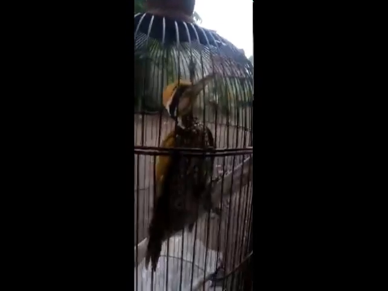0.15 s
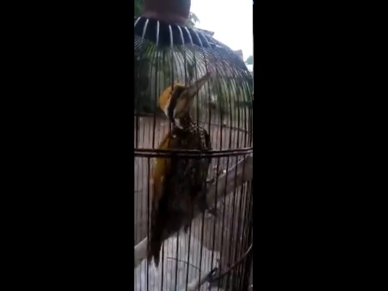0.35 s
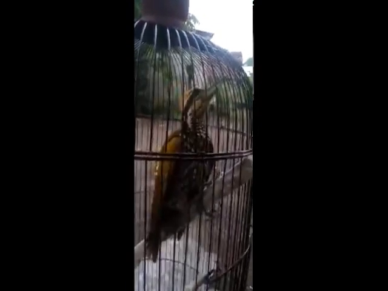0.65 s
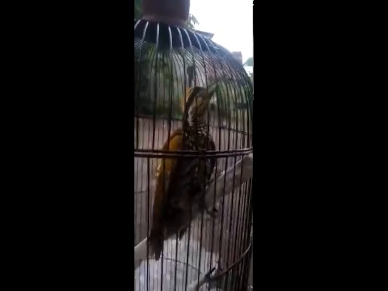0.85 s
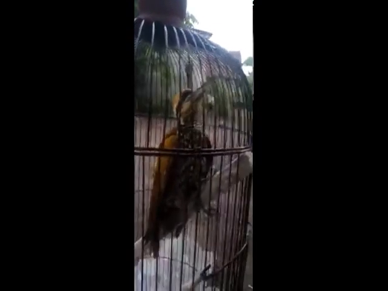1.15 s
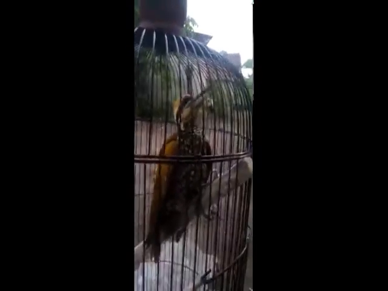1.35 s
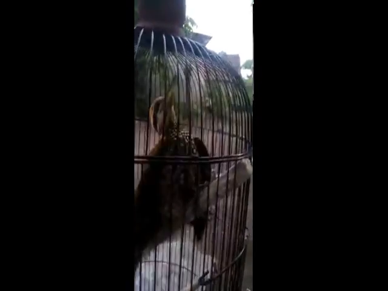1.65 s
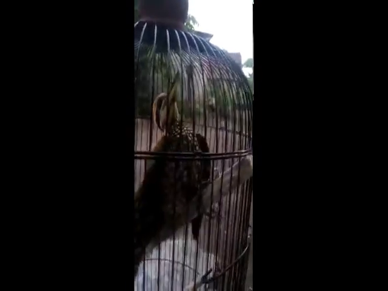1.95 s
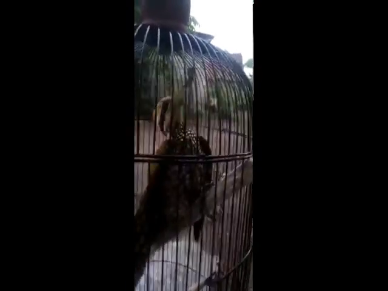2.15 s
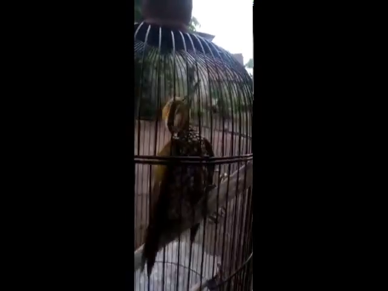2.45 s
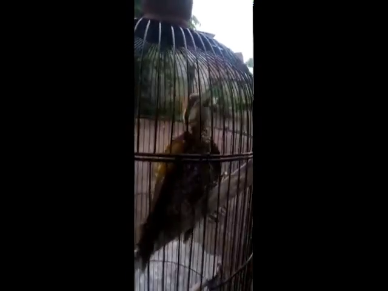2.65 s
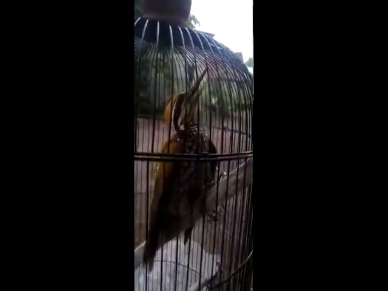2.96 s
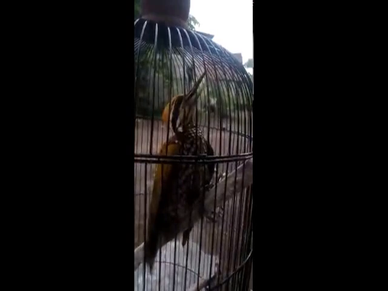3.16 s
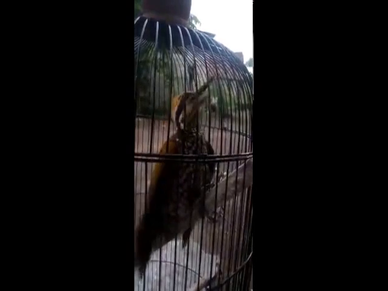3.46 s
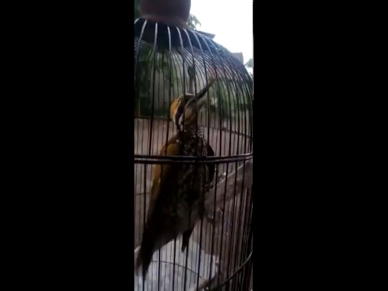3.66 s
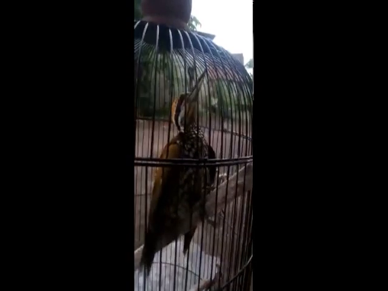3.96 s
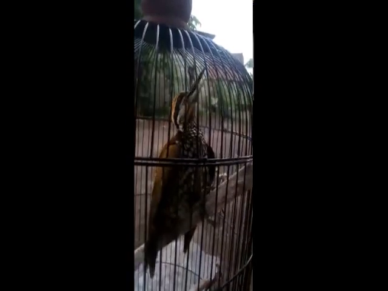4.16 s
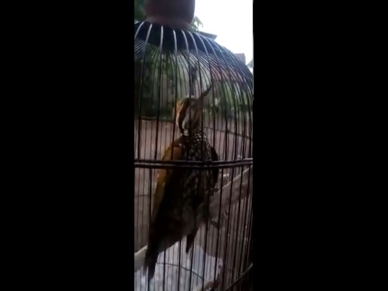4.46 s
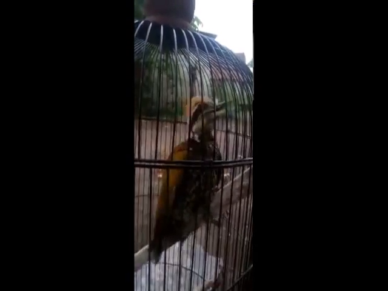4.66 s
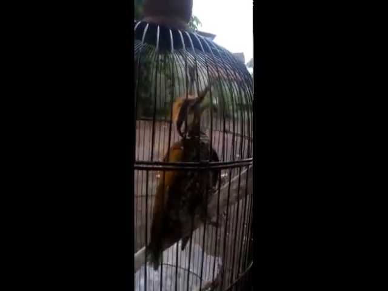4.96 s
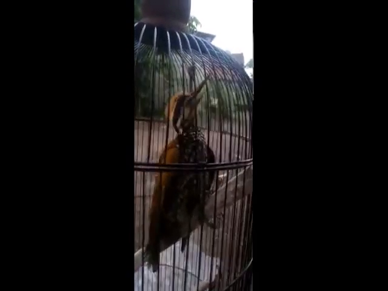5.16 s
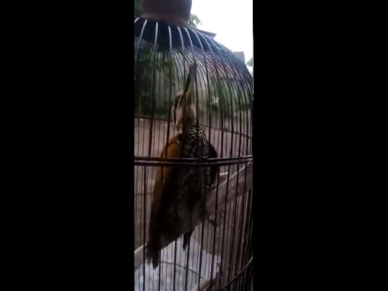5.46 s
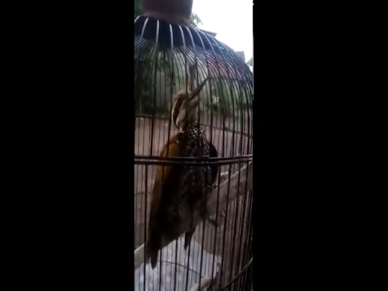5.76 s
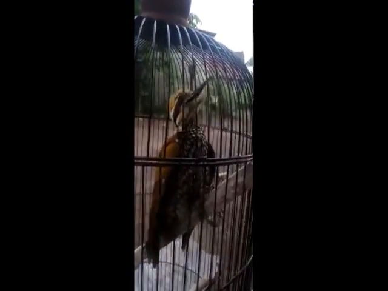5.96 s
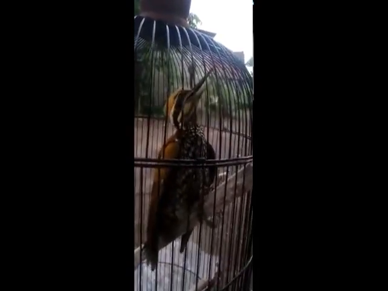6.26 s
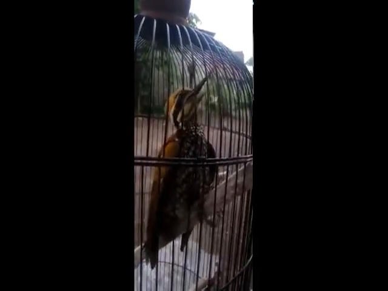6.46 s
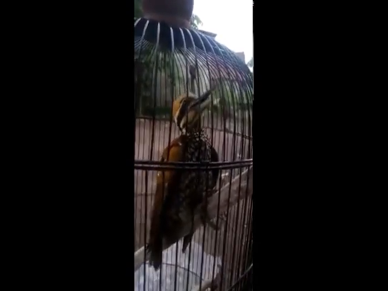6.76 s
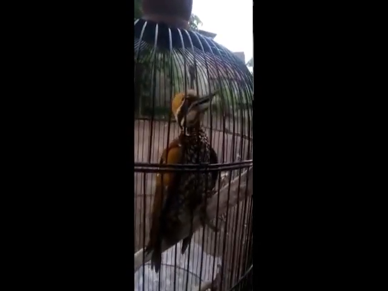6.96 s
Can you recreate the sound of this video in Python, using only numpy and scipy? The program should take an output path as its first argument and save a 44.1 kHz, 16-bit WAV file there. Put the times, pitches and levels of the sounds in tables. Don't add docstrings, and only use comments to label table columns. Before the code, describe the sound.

Quiet walled yard with leaf rustle, faint bird calls and distant cock over traffic, then a loud, fast woodpecker rattle close by to the end.

```python
import sys
import numpy as np
from scipy import signal
from scipy.fft import rfft, irfft, next_fast_len
from scipy.io import wavfile
from scipy.ndimage import uniform_filter1d

SR = 44100
rng = np.random.default_rng(int(sys.argv[2]) if len(sys.argv) > 2 else 0)


def volts(x):
    e = np.asarray(x, float) / 20
    return 10 ** e


def bounce(signal):
    frames = np.transpose(np.atleast_2d(signal))
    limited = np.clip(frames, -1, 1)
    pcm = np.round(limited * 32767).astype(np.int16)
    wavfile.write(sys.argv[1], SR, pcm)


N = 313992
TIME_S = np.arange(N) / SR
PORT_LAG = 9.18

# start_s, level_db, length_ms, throat opening as first_over_second_partial_db
RATTLE_NOTES = [(2.79, -19, 21.2, -1.5), (2.861, -17, 22.4, 1), (2.931, -16, 21.2, 0.5), (3.0, -17.5, 23, -1),
                (3.07, -18, 22.7, 1), (3.141, -17, 25.2, 0.5), (3.212, -17, 24.4, -0.5),
                (3.285, -17, 22.3, -4.5), (3.361, -16, 23.1, -0.5), (3.434, -17, 25.6, 0),
                (3.509, -17.5, 25, 1.5), (3.585, -17.5, 23.4, -2), (3.663, -17.5, 22, -2),
                (3.741, -18, 24.5, -2.5), (3.821, -17, 21, -4), (3.901, -17.5, 25.4, 0), (3.984, -14.5, 20.6, 1),
                (4.07, -15.5, 20.3, 2.5), (4.151, -16.5, 21.5, -1), (4.233, -17.5, 22.6, -2.5),
                (4.312, -15, 21, 1), (4.392, -16, 26, 2), (4.474, -16, 27.7, 1.5), (4.56, -17.5, 30.7, -2),
                (4.664, -18.5, 29, -9),
                (4.774, -17.5, 30.65, -2.5), (4.862, -18, 28.34, -3), (4.947, -18, 25.1, -1),
           (5.03, -17, 26.46, -2), (5.115, -16, 22.97, -4), (5.199, -18.5, 24.9, -5.5),
           (5.288, -15, 21.18, -1.5), (5.373, -14.5, 23.32, 1), (5.457, -15, 23.69, 2),
           (5.547, -15.5, 22.03, -0.5), (5.634, -14.5, 21.6, 3.5), (5.717, -15.5, 23.73, 1.5),
           (5.811, -17.5, 25.83, -2), (5.917, -16.5, 23.58, -3), (6.01, -18, 29.08, -6),
           (6.1, -16, 25.5, 1), (6.186, -16, 27.44, 2), (6.273, -15, 23.92, 0), (6.364, -16.5, 24.9, -2.5),
           (6.454, -17, 24.26, -4.5), (6.543, -16.5, 30.05, -2), (6.633, -17, 28.93, -2.5),
           (6.736, -18, 27.88, -3), (6.835, -18.5, 30, -3.5), (6.941, -16.5, 29.52, -7.5),
           (7.052, -17, 27.2, -2)]
# multiple, left_level_db, right_re_left_db, change_at_full_sag_db
THROAT = [
    (1, -1, -11, -10),
    (2, -4, -13, 1),
    (3, -1, -12.5, -5.5),
    (4, -8, -2.5, -11.5),
]
PITCH_ARCH = [(-.2, 1.3), (.05, .9), (.2, .12), (.5, 0.0065), (.72, .22), (.92, 0.95), (1.35, 1.5)]
# share_of_length, level_db
NOTE_SWELL = [(-.25, -52), (-.08, -21.5), (0, 0.5), (.15, 2.5), (.75, 2.5), (1.0, 1.5), (1.35, -44)]
TOP_HZ, TOP_SPREAD_HZ = 1790.4, 14
TIRES_S, TIRING_HZ_PER_S = 6.2, 110
FAST_GAP_S, FAST_SAG_HZ, SAG_HZ_PER_S_GAP = 0.061, 107.4, 3900


def rattle(notes):
    out, envelope, which = np.zeros((2, N + SR)), np.zeros(N + SR), np.zeros(N + SR, int)
    colour = rng.standard_normal((len(notes), 4))
    flutter = np.pad(volts(3.3 * wobble(420, size=8)), ((0, 0), (0, SR)))
    jitter = np.pad(0.02 * wobble(300, size=1)[0], (0, SR))
    gaps_s = np.diff(np.array(notes)[:, 0], append=notes[-1][0] + 0.096)
    for n, (start_s, level_db, length_ms, first_db) in enumerate(notes):
        top_hz = TOP_HZ + TOP_SPREAD_HZ * colour[n, 0] - TIRING_HZ_PER_S * max(start_s - TIRES_S, 0)
        sag_hz = FAST_SAG_HZ + SAG_HZ_PER_S_GAP * (gaps_s[n] - FAST_GAP_S)
        length = length_ms * SR / 1000
        share = np.arange(-.25 * length, 1.35 * length) / length
        first = round(start_s * SR - length / 4)
        at = slice(first, first + len(share))

        sag = np.interp(share, *np.transpose(PITCH_ARCH))
        hz = (top_hz - sag_hz * sag) * (1 + jitter[at] * (1 + sag))
        phase = 2 * np.pi * np.cumsum(hz) / SR
        right_phase = phase + 2 * np.pi * hz * PORT_LAG / SR
        swell = volts(level_db + np.interp(share, *np.transpose(NOTE_SWELL)))
        opening_db = [first_db, 0, 2.6 * colour[n, 2], 2.9 * colour[n, 3]]
        gains = volts(opening_db + np.array(THROAT)[:, 1])
        gains = gains / np.linalg.norm(gains)
        for i, (multiple, _, right_db, sag_db) in enumerate(THROAT):
            gain = swell * volts(sag_db * sag) * gains[i]
            out[0, at] += gain * flutter[i, at] * np.sin(round(multiple) * phase)
            right = np.sin(round(multiple) * right_phase)
            out[1, at] += gain * flutter[i + 4, at] * volts(right_db) * right
        envelope[at] += swell
        which[round(start_s * SR):] = n
    return out[:, :N], envelope[:N], which[:N]


# frequency_hz, density_db_per_hz
HAZE = [(20, -22.5), (60, 5), (300, -5.5), (900, -15), (1500, -2.5), (2500, -9.5), (3300, -4.5),
        (5000, -13), (6200, -17.5), (7300, -27.5), (7700, -43)]


def note_haze(envelope):
    early = np.roll(uniform_filter1d(envelope, size=900), -round(0.0066 * SR))
    return volts(-13.0) * early * noise(HAZE, .2, 4.83, 90) * volts([[0], [-11]])


# pitch_hz, level_db
FIZZ_TONES = [(8436, -68), (9189, -58), (9938, -62.5), (10686, -65.5), (11440, -74), (12188, -57),
              (12936, -56.5), (14061, -67)]
# frequency_hz, density_db_per_hz
FIZZ_NOISE = [(8100, -22), (8600, 1), (9800, -11), (10800, 1), (11800, 1.5), (12700, 1), (13600, -7.5),
              (14200, -7.5), (15000, -36)]


def top_fizz(envelope, which):
    sharp = 8.7 * envelope ** 2
    follow = sharp + volts(-6) * signal.lfilter([.0006], [1, -.9994], sharp)
    out = volts(-31) * noise(FIZZ_NOISE, 0.14, 6.8, 30, per_octave=12)
    for hz, level_db in FIZZ_TONES:
        on = rng.random((which.max() + 1, 2)) < .6
        out += volts(level_db + 26.5) * on[which].T * np.sin(2 * np.pi * hz * TIME_S)
    return follow * out * volts([[0], [-2]])


# start_s, length_s, first_pitch_hz, last_pitch_hz, level_db
BUZZ = (-.02, .28, 3060, 2850, -37)


def buzzy_call():
    return voice(call(BUZZ, .01, .1, fade_db=20, bend=2.5), [0, -30], .035, 3.1, 130)


# start_s, length_s, first_pitch_hz, last_pitch_hz, level_db
SQUAWK = (.02, .26, 540, 490, -48)
SQUAWK_PARTIALS_DB = [-11, 0.5, -15.5, -7.5, -13, -4.5, -13.5, -13.5, -30, -31, -24, -12]


def squawk():
    curve = call(SQUAWK, .07, .08, fade_db=5, bend=1.5, edge_db=12)
    return voice(curve, SQUAWK_PARTIALS_DB, 0.02, 4.0, 70)


# start_s, length_s, first_pitch_hz, last_pitch_hz, level_db
WHISTLES = [
    (1.9, .09, 1500, 3650, -33),
    (6.545, .085, 1490, 3950, -26),
]


def whistles():
    curves = [call(w, 0.021, 0.037, fade_db=-2.0, bend=.8, glide=.7) for w in WHISTLES]
    return sum(voice(curve, [0, -33], 0.075, 4.7, 300) for curve in curves)


# start_s, length_s, first_pitch_hz, last_pitch_hz, level_db
CROW = [
    (.99, 0.13, 514, 538, -49.5),
    (1.03, .11, 629, 634, -50.5),
    (1.15, 0.11, 617, 621, -50),
    (1.31, .55, 616.5, 592, -60),
    (1.33, .42, 734.6, 706, -54),
    (2.02, 0.39, 670, 609, -58.5),
    (6.24, 0.28, 779, 759, -55),
    (6.7, .5, 757, 757, -60),
]
CROW_OCTAVE_DB = [-45, -26, -22, -18, -9.5, -9.5, -22, -22]


def far_cock():
    out = np.zeros(N)
    for syllable, octave_db in zip(CROW, CROW_OCTAVE_DB):
        curve = call(syllable, 0.037, 0.05, fade_db=1.0, bend=1.2)
        out += voice(curve, [0, octave_db], 0.03, 4.5, 45)
    return out


# start_s, length_s,
# first_pitch_hz, last_pitch_hz, level_db
HIDDEN = [
    (.43, .2, 5700, 5000, -64),
    (1.465, .17, 6900, 2900, -55),
    (2.38, .38, 4250, 4450, -65),
    (2.6, .17, 2900, 4900, -64),
    (2.64, .14, 2035, 3040, -57),
]


def hidden_whistles():
    curves = [call(w, .03, .04, fade_db=3.5, bend=.7, edge_db=6) for w in HIDDEN]
    return sum(voice(curve, [0], 0.02, 2.5, 160) for curve in curves)


def neighbours():
    near = ports(buzzy_call() + squawk() + whistles(), -13.5) * volts(4.0)
    far = ports(far_cock(), -5) * volts(3.0)
    return near + far, volts(-7.5) * near + volts(-1.5) * far + ports(hidden_whistles(), -8.5)


def call(row, attack_s, release_s, fade_db, bend, edge_db=18, glide=1):
    start_s, length_s, first_hz, last_hz, level_db = row
    t = np.linspace(0, length_s, num=24)
    edges = np.clip(1 - t / attack_s, 0, 1) + np.clip(1 - (length_s - t) / release_s, 0, 1)
    glided = np.minimum(t / length_s / glide, 1) ** bend
    hz = first_hz * (last_hz / first_hz) ** glided
    return list(zip(start_s + t, hz, level_db - fade_db * t / length_s - edge_db * edges))


def voice(rows, partials_db, jitter, flutter_db, flutter_hz):
    before = (rows[0][0] - .005, rows[0][1], -130)
    after = (rows[-1][0] + 0.0042, rows[-1][1], -130)
    s, hz, level_db = np.transpose([before, *rows, after])
    at = np.arange(max(round(s[0] * SR), 0), min(round(s[-1] * SR), N))
    hz, level_db = np.interp(at / SR, s, hz), np.interp(at / SR, s, level_db)
    unsteady_hz = hz * (1 + jitter * wobble(300, size=1, count=len(at))[0])
    phase = 2 * np.pi * np.cumsum(unsteady_hz) / SR
    flutter = flutter_db * wobble(flutter_hz, size=len(partials_db), count=len(at))
    shake = volts(level_db + 4.0 + flutter)
    out = np.zeros(N)
    out[at] = sum(volts(d) * shake[k] * np.sin((k + 1) * phase) for k, d in enumerate(partials_db))
    return out


def ports(x, right_db):
    return np.array([x, volts(right_db) * np.interp(np.arange(N) + PORT_LAG, np.arange(N), x)])


def yard(x):
    t60_s, build_up_s = 0.53, 0.0086
    t = np.arange(SR) / SR
    tail = rng.standard_normal((2, SR)) * volts(-60 * t / t60_s) * np.clip(t / build_up_s, 0, 1)
    return signal.fftconvolve(x, tail / np.sqrt(np.sum(tail ** 2) / 2), axes=1)[:, :N]


# start_s, hold_s, leaf_hiss_db, high_rustle_db
STIRS = [
    (0, 0.28, -61, -72),
    (0.484, 0.25, -81.5, -88),
    (1.093, 0.65, -76, -103),
    (1.66, 0, -74, -75.5),
    (1.95, 0.04, -66.5, -89.5),
    (2.7, 7, -70.5, -78),
]


def stirring():
    rise_db_per_s, fall_db_per_s = 233, 212
    still_leaf_db, still_rustle_db = -86, -101
    start_s, hold_s, *levels = np.transpose(STIRS)[:, :, None]
    t = np.arange(0, N + 64, 64) / SR
    rising_db = rise_db_per_s * np.maximum(start_s - t, 0)
    falling_db = fall_db_per_s * np.maximum(t - start_s - hold_s, 0)
    curves = []
    for level_db, still_db in zip(levels, [still_leaf_db, still_rustle_db]):
        loudest_db = (level_db - (rising_db + falling_db)).max(axis=0)
        curves.append(np.interp(TIME_S, t, np.maximum(loudest_db, still_db)))
    return curves


# frequency_hz, density_db_per_hz
LEAVES = [(880, -29.5), (1500, -18), (2140, -21.5), (2540, -16), (3500, -9.5), (4840, -11), (5770, -23),
          (6550, -42), (7500, -26), (9750, -67), (16500, -120)]
# frequency_hz, density_db_per_hz
RUSTLE = [(4470, -39), (7600, -10.5), (8250, -2.5), (8990, -8.5), (10800, 3.5), (11900, -8.5),
          (14100, -8.5), (14400, -32), (15000, -40)]


def foliage():
    leaf_db, rustle_db = stirring()
    leaves = volts(leaf_db + 12.5) * noise(LEAVES, .05, 8.0, 6, per_octave=12) * volts([[0], [-9]])
    rustle = volts(rustle_db + 15.5) * noise(RUSTLE, 0.048, 3.6, 6.48) * volts([[0], [-3]])
    return leaves + rustle


# time_s, level_db
TRAFFIC = [(0, -44.5), (.3, -47.5), (.9, -51), (1.7, -51), (2.6, -51), (4.4, -49.5), (4.7, -51),
           (5.6, -49.5), (5.9, -50.5), (6.5, -48), (7.12, -51)]
# frequency_hz, density_db_per_hz
RUMBLE = [(12, -65), (20, -14), (54, -6.5), (139, -0.5), (188, -8), (227, -1.5), (300, -15.5), (500, -20),
          (560, -25), (639, -19.5), (786, -34), (1000, -24.5), (1800, -57.5), (2340, -106), (3960, -120)]


def traffic():
    level_db = np.interp(TIME_S, *np.transpose(TRAFFIC))
    return volts(level_db + 4.5) * noise(RUMBLE, 1.0, 2.66, 14) * volts([[0], [-7]])


# pitch_hz, level_db
HUM = [
    (9000, -100),
    (10500, -104),
    (12000, -89),
    (13500, -102),
]


def electric_hum():
    return sum(volts(level_db) * np.sin(2 * np.pi * hz * TIME_S) for hz, level_db in HUM)


def noise(points, alike, patchy_db, patch_rate, per_octave=3):
    long = next_fast_len(N, True)
    mid, side = rfft(rng.standard_normal((2, long)))
    hz, level_db = np.transpose(points)
    grid = np.arange(1, len(mid) + 1)
    colour = volts(np.interp(np.log(grid * SR / long), np.log(hz), level_db, -90, -90))
    pair = colour * (np.sqrt(1 + alike) * mid + np.sqrt(1 - alike) * side * [[1], [-1]])
    band = (per_octave * np.log2(grid)).astype(int) % 8
    flicker = volts(patchy_db * wobble(patch_rate, size=8))
    return rms_one(sum(flicker[k] * irfft(pair * (band == k), long)[:, :N] for k in range(8)))


def wobble(rate_hz, size, count=N):
    knots = rng.standard_normal((size, 4000))
    return np.array([np.interp(np.arange(count) * rate_hz / SR, np.arange(4000), k) for k in knots])


def rms_one(x):
    return x / np.sqrt(np.mean(x ** 2) + 1e-20)


def scene():
    notes, envelope, which = rattle(RATTLE_NOTES)
    direct, echoed = neighbours()
    birds = notes + direct + yard(volts(-18) * notes + echoed)
    return birds + note_haze(envelope) + top_fizz(envelope, which) + foliage() + traffic()


def thin_out(x, size, width_hz):
    drop_db, grain_db, floor_db = -17, -5, -102
    hz, _, cells = signal.stft(x, SR, "cosine", nperseg=size)
    band = (hz / width_hz).astype(int)
    starts = np.flatnonzero(np.diff(band, prepend=-1))
    band_hz = hz[starts, None]
    peak_db = 20 * np.log10(np.maximum.reduceat(np.abs(cells), starts, axis=1) + 1e-12)
    apart_khz = np.abs(band_hz - hz[starts]) / 1000
    loud_db = np.where(band_hz > 900, peak_db, -200)
    masker_db = np.max(loud_db[:, None] - 11.0 * apart_khz[:, :, None], axis=2)
    uneven_db = 5.0 * np.repeat(rng.standard_normal(peak_db.shape), 2, axis=2)[..., :peak_db.shape[2]]
    threshold_db = np.maximum(masker_db + drop_db, floor_db) + uneven_db
    kept = (peak_db > threshold_db) | (band_hz < 900)
    step = volts(peak_db + grain_db)[:, band]
    grainy = kept[:, band] * step * np.round(cells / step)
    return signal.istft(grainy, SR, "cosine", nperseg=size)[1][:, :N]


def roll_off(x):
    return signal.sosfilt(signal.butter(12, 15480, fs=SR, output="sos"), x)


def record(dry):
    turn, lap = round(2.765 * SR), 4096
    calm = thin_out(dry[:, :turn + lap], size=2048, width_hz=110)
    busy = thin_out(dry[:, turn - lap:], size=768, width_hz=400)
    joined = np.hstack([calm[:, :turn], busy[:, lap:lap + N - turn]])
    return roll_off(joined + electric_hum())


dry = scene()
out = record(dry)
bounce(out)
```